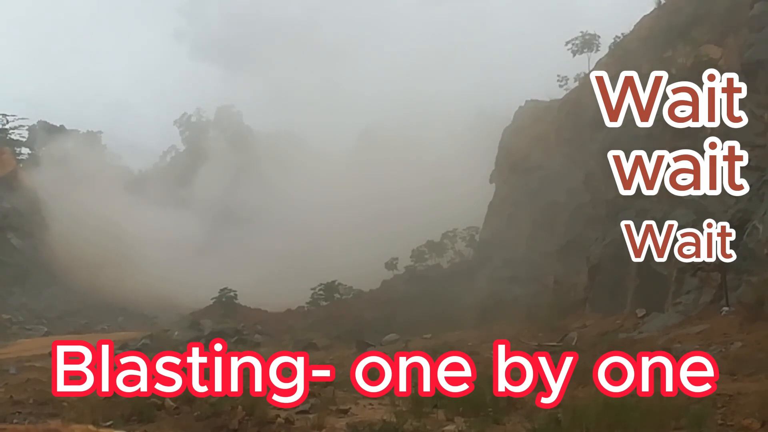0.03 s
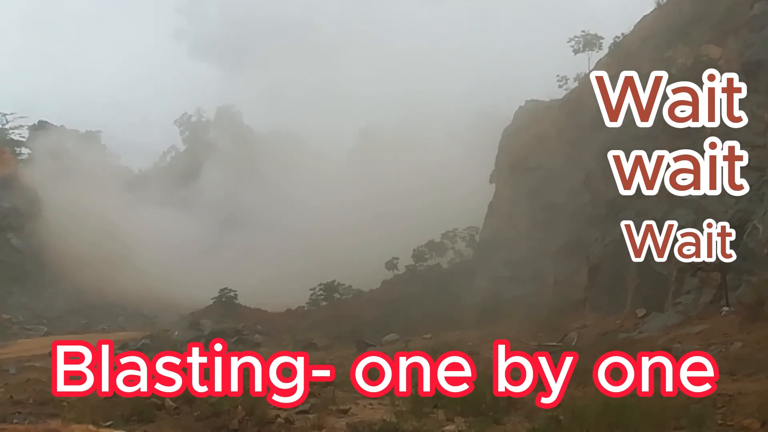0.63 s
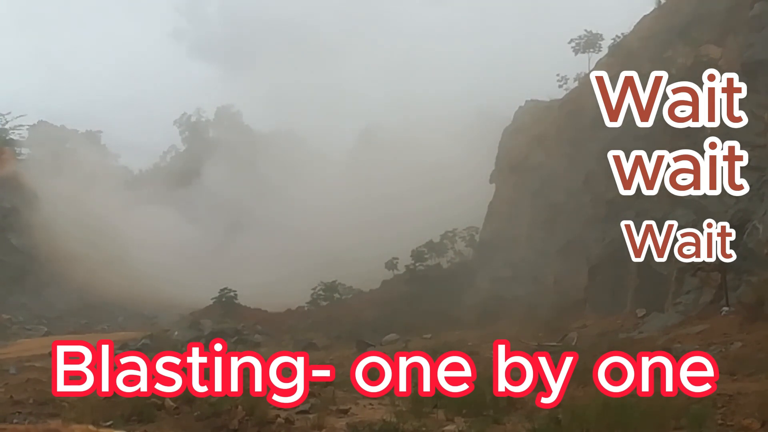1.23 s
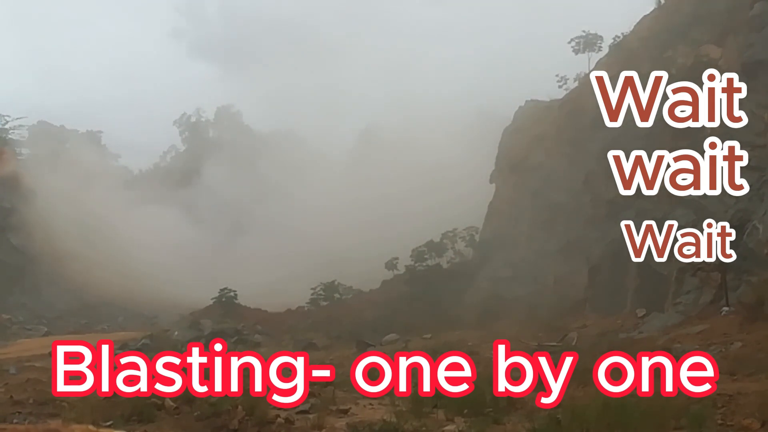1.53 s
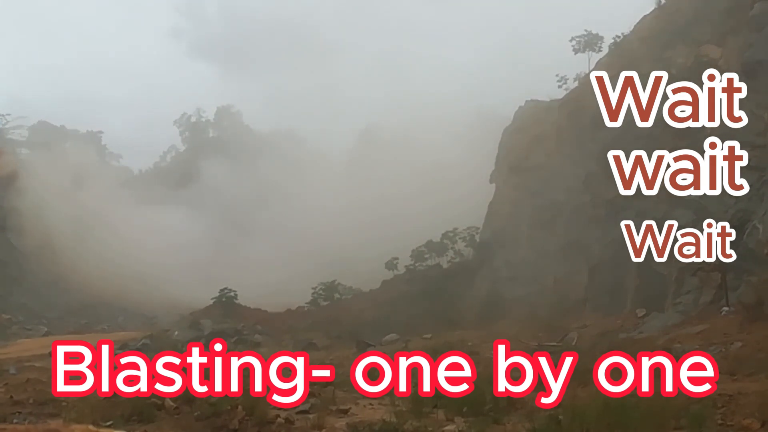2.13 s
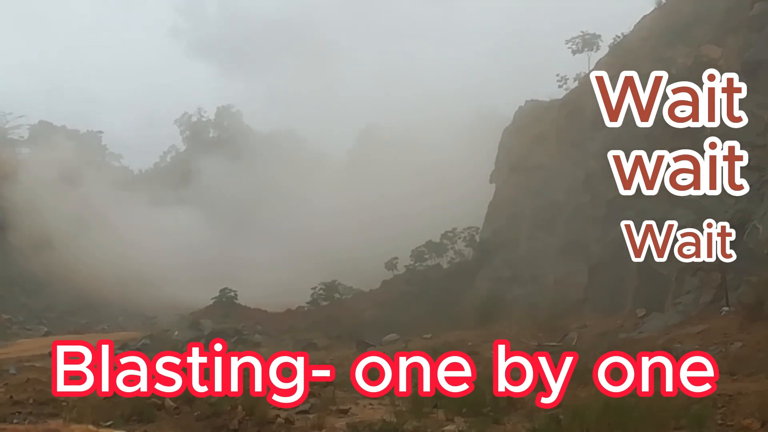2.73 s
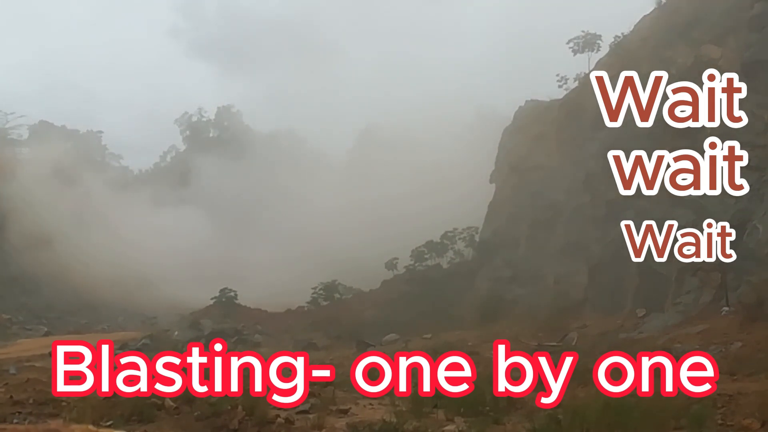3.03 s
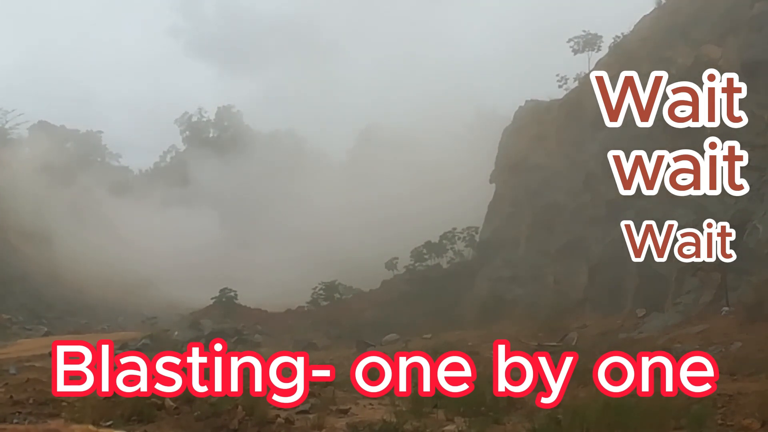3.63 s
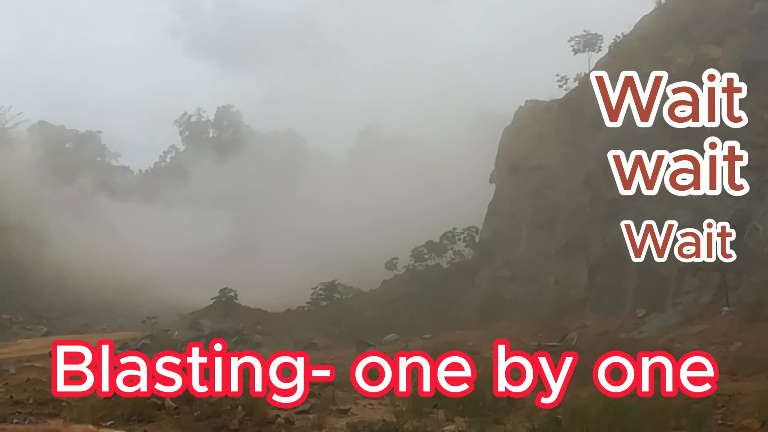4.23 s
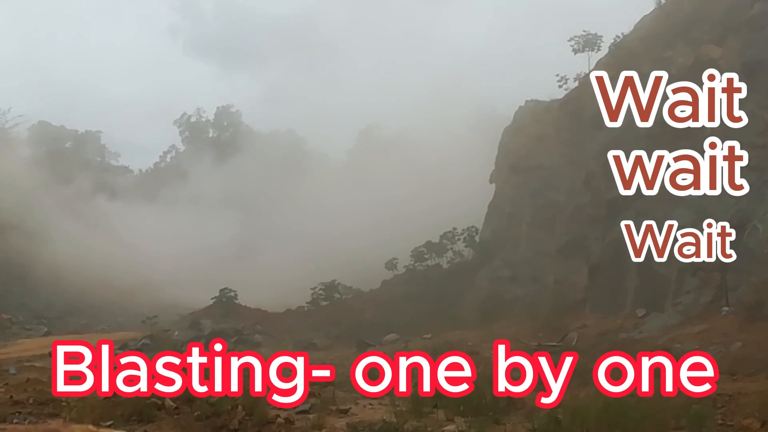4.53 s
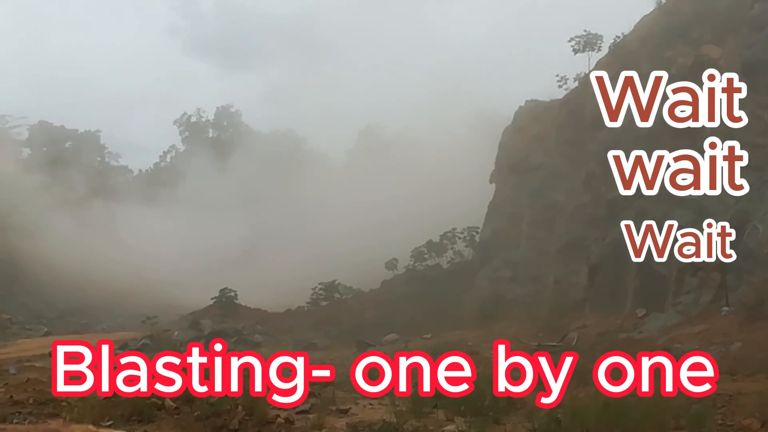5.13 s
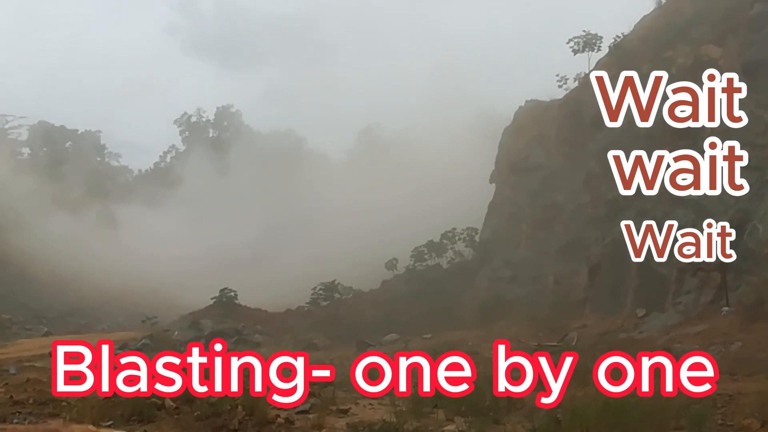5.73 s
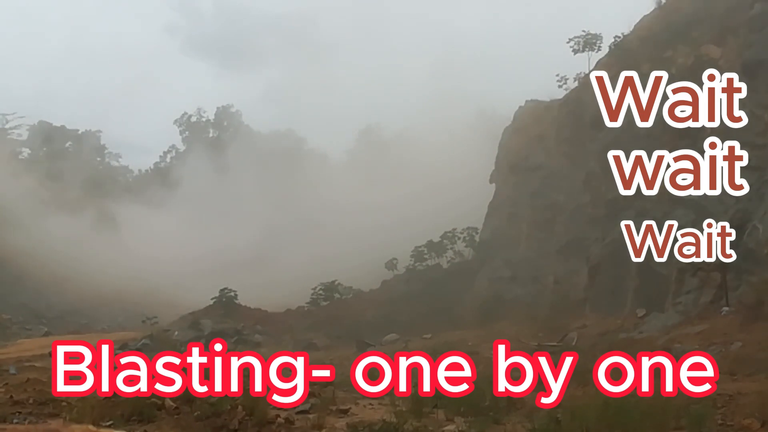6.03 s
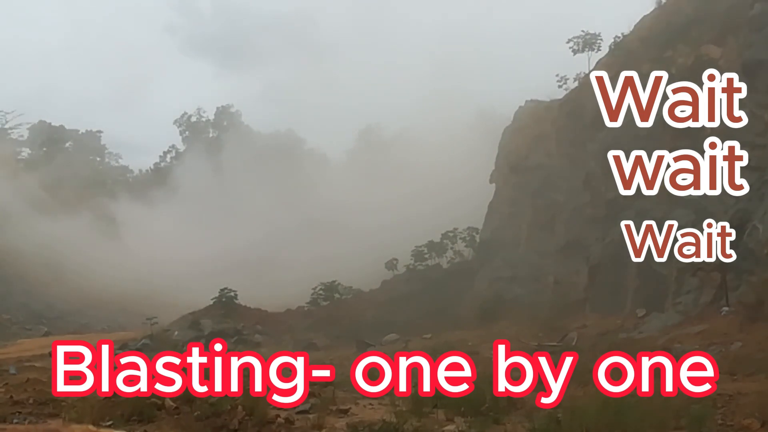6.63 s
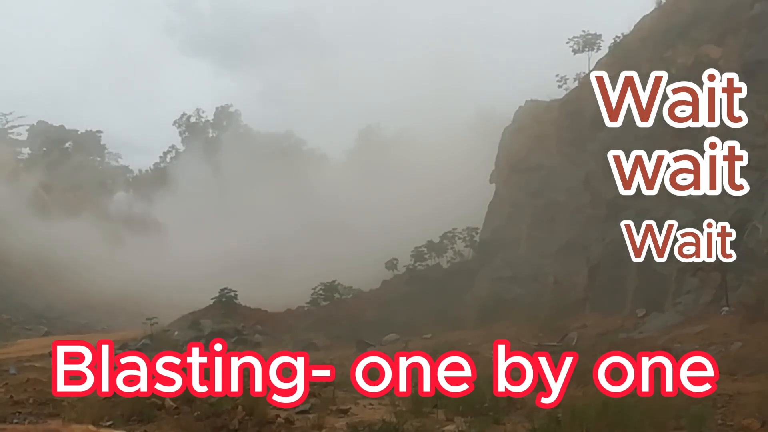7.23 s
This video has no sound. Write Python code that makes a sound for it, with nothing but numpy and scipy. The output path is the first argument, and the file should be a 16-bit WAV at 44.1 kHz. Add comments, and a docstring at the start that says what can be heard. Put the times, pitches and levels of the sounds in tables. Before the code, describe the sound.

A dull shudder and sharp explosion send rock rumbling down a quarry face; the debris settles, then two more blasts follow quickly.

```python
"""Stones clack over a trickle of debris, then shot holes fire one by one in a quarry. Each shot comes
first through the ground as a dull shudder, a fifth of a second later through the air as a boom and crack.
Rock slides down the face, boulders thud into soft spoil, insects sing faintly.
A small two-port microphone rounds off the loudest peaks."""
import sys
import numpy as np
from scipy import signal
from scipy.fft import rfft, irfft, next_fast_len
from scipy.io import wavfile
from scipy.ndimage import uniform_filter1d

SR = 44100
rng = np.random.default_rng(int(sys.argv[2]) if len(sys.argv) > 2 else 0)


def file_out(sig):
    """Save sig as 16-bit WAV at sys.argv[1]."""
    # one column per channel
    cols = np.atleast_2d(sig).T
    # limit, then scale
    lim = np.clip(cols, -1, 1)
    pcm = np.round(lim * 32767).astype(np.int16)
    wavfile.write(sys.argv[1], SR, pcm)


N = 330309

# insect chorus: t/s, level/dB
CHORUS_LEVEL = [(0, -69), (4, -62), (5, -62.5), (7.49, -64.5)]
# source spectra: f/Hz, level/dB
INSECT_SPECTRUM = [(4500, -37), (5600, 0), (6300, 7), (7000, 2.5), (8200, -16), (11000, -39.5)]
AIR_SPECTRUM = [(200, -28), (600, 3), (1250, 12), (2000, 2.5), (4000, -1), (9000, -4), (15000, -6)]
DEBRIS_SPECTRUM = [(200, -1), (380, -7), (600, 1), (800, 6), (1100, 0), (1500, -10.5), (2200, -14),
                   (3000, -10), (4000, -11), (5400, -8), (6500, -17), (8000, -27.5), (10300, -29.5),
                   (15000, -49)]
RUMBLE_SPECTRUM = [(20, -8), (50, 0.5), (110, 2.5), (190, -4), (300, -15), (600, -19.5), (1500, -62)]
SHOCK_SPECTRUM = [(30, -21), (80, 1), (170, -5), (260, -6.5), (380, -21), (700, -32), (1300, -28),
                  (2300, -74), (3500, -100)]
CRACK_SPECTRUM = [(150, -19), (270, -35.5), (500, -15.5), (800, -13), (1150, -22.5), (1700, -39),
                  (3000, -29.5), (5400, -31.5), (7500, -46.5), (10000, -51), (15000, -48)]
# right port against left, for the face and for boulders: f/Hz, level/dB
FACE_SHADE = [(200, -0.4), (400, -1.5), (740, -13.5), (1000, -10.5), (1300, 7.5), (2100, -3.5), (3200, -12),
              (5300, -21), (7800, -12.5), (11000, -10), (15000, 1.5)]
THUD_SHADE = [(200, 1), (450, -3.5), (1000, -11.5), (2000, -9.5)]
# stone strikes: t/s, level/dB, ring f/Hz, tick re ring/dB
STONE_HITS = [(0.014, -36.5, 1160, 14), (0.074, -33.5, 1090, 10.5), (0.201, -35.5, 790, 3.5),
              (0.407, -39, 3310, -17), (0.445, -38.5, 3400, 6), (0.467, -34, 1065, -4),
              (0.502, -43, 800, 4), (1.37, -40.5, 970, 16.5), (1.629, -19, 5630, 3.5),
              (1.678, -20, 726, 12.5), (1.73, -18, 2860, -1), (1.827, -12.5, 860, 2), (1.9, -15, 930, -6),
              (2.416, -20, 800, -26), (2.488, -25, 5990, -20), (3.025, -23, 980, -4),
              (3.101, -24, 6080, -9), (3.265, -25, 1360, 10.5), (3.337, -25, 5700, 0),
              (3.805, -29, 4300, 2), (3.931, -22.5, 5460, -24), (4.342, -24, 1145, -13),
              (4.429, -42, 1140, 14.5), (4.581, -40.5, 4930, 5), (4.843, -44, 2130, 14.5),
              (5.346, -38.5, 3160, -3), (5.692, -40.5, 5580, -1.5)]
# stone resonances: f ratio, level/dB
RING_MODES = [(1, 9), (1.2, -13), (1.58, -12), (2.8, -31)]
# boulder landings: t/s, level/dB, brightness/Hz, t60/s
LANDINGS = [(1.221, -24, 88, 0.1), (1.859, -26, 190, 0.39), (1.999, -31, 190, 0.24),
            (2.243, -24.5, 160, 0.1), (2.521, -29, 131, 0.093), (2.804, -30, 99, 0.11),
            (3.41, -24.5, 88, 0.059), (3.589, -25, 91, 0.053), (3.72, -40, 100, 0.14),
            (4.189, -45, 113, 0.31), (4.426, -44, 131, 0.32), (4.874, -24, 500, 0.17),
            (4.941, -17, 154, 0.035), (4.955, -26.5, 414, 0.25), (5.095, -33, 402, 0.24),
            (5.167, -38.5, 160, 0.089), (5.261, -34.5, 198, 0.048), (5.437, -37, 161, 0.14),
            (5.501, -33, 164, 0.1), (5.607, -40, 169, 0.078), (5.805, -24, 650, 0.31),
            (5.8284, -21, 1020, 0.026), (5.851, -23, 635, 0.095), (5.887, -26.5, 149, 0.14)]
# debris slides: t/s, length/s, gravel/dB, rock/dB, rumble/dB, sizzle re gravel/dB
DEBRIS_SLIDES = [(0, 0.64, -52, -52.5, -51, -18), (0.935, 0.23, -42, -39, -30.5, 0.5),
                 (1.106, 1, -52.5, -42.5, -35, -1), (1.31, 0.87, -40.5, -33, -32, -0.5),
                 (1.56, 3.14, -28.5, -22.5, -27.5, 4), (6.391, 0.057, -34, -30.5, -25, 6.5),
                 (6.5, 2, -38, -34, -24.5, 1), (6.948, 2, -35, -30.5, -45.5, 1)]
# slide envelopes: rise/s, sag/(dB/s), added sag on running out/(dB/s), idle level/dB
GRAVEL_LAW = (0.14, 3.5, 10, -63)
ROCK_LAW = (0.44, 10.5, -3.5, -73)
RUMBLE_LAW = (0.42, 7.5, 6, -55)
# shots through the ground: t/s, jolt/dB, length/s, coda/dB, rasp/dB
GROUND_SHOCKS = [(0.73, -18, 0.046, -20, -54.5), (6.167, -14.5, 0.061, -18.5, -41.5),
                 (6.792, -20.5, 0.11, -25.5, -40)]
# shots through the air: t/s, boom/dB, boom f/Hz, f ratio per surge, crack/dB, crack fall per surge/dB,
# crack top/Hz, front/dB
AIR_BLASTS = [(0.9568, 3, 81, 1.2, -17.5, 3, 8300, 1), (6.408, 6, 120.5, 0.743, -11, 9.5, 12700, 1.5),
              (6.982, 3, 135.8, 0.66, -15, 3.5, 9600, -0.5)]
# three surges of a blast: delay/s, boom offset/dB, boom t60/s, crack t60/s
VENT_SURGES = [(0, 1, 0.074, 0.14), (.0165, -4, 0.097, 0.24), (.045, -9, 0.18, 0.21)]

SETTLE_DB_PER_S = 39  # after a slide or a landing


def undb(db):
    """Decibels to gain."""
    return 10 ** (np.asarray(db) / 20)


def unit(x):
    """Scale to rms 1."""
    return x / np.sqrt(np.mean(x ** 2) + 1e-20)


def colour(x, spectrum):
    """Minimum-phase filter from (f/Hz, level/dB) points; attacks stay sharp."""
    hz, db = np.transpose(spectrum)
    size = next_fast_len(x.shape[-1] + 4096, True)
    size += size % 2
    bins_hz = np.fft.rfftfreq(size, 1 / SR)
    gain = undb(np.interp(np.log(bins_hz + 1), np.log(hz), db))
    cepstrum = irfft(np.log(gain))
    cepstrum[1:size // 2] *= 2
    cepstrum[size // 2 + 1:] = 0
    return irfft(rfft(x, size) * np.exp(rfft(cepstrum)))[..., :x.shape[-1]]


def band(x, hz, kind="bandpass", order=2):
    """Butterworth filter."""
    return signal.sosfilt(signal.butter(order, hz, kind, fs=SR, output="sos"), x)


def waver(rate_hz):
    """Random steps, smoothed twice; rms 1."""
    hold = int(SR / rate_hz)
    steps = np.repeat(rng.standard_normal(N // hold + 1), hold)
    return unit(uniform_filter1d(uniform_filter1d(steps, hold), hold)[:N])


def port_noise(samples, spread):
    """White noise at two ports: one shared part, one of their own each."""
    noise = rng.standard_normal((3, samples))
    return (noise[0] + spread * noise[1:]) / np.sqrt(1 + spread ** 2)


def lagged(x, samples):
    """Delay the right port."""
    return np.array([x[0], np.concatenate([np.zeros(samples), x[1, :-samples]])])


def fade(t, rise_s, t60_s):
    """Quick rise, exponential decay."""
    return (1 - np.exp(-t / rise_s)) * undb(-60 * t / t60_s)


def burst(noise, envelope):
    """Enveloped noise, scaled to the envelope's rms."""
    return unit(noise * envelope) * np.sqrt(np.mean(envelope ** 2))


def add(out, at_s, x):
    """Mix x in at at_s."""
    start = max(int(at_s * SR), 0)
    out[:, start:start + x.shape[-1]] += x[..., :N - start]


def insects_and_air(air_db=-67):
    """Far insect chorus over the faint hiss of open air."""
    chorus_db = np.interp(np.arange(N) / SR, *np.transpose(CHORUS_LEVEL))
    chorus = unit(colour(rng.standard_normal((2, N)), INSECT_SPECTRUM))
    chorus *= undb(chorus_db + .5 * waver(7.4))
    air = unit(colour(rng.standard_normal((2, N)), AIR_SPECTRUM))
    return chorus * undb([[1.5], [-1.5]]) + undb(air_db) * air


def aftershake(band_hz=(24, 120), offset_db=-20.5):
    """Landing boulders leave a deep ground rumble that settles."""
    kicks = np.zeros(N)
    for at_s, db, *_ in LANDINGS:
        kicks[int(at_s * SR)] += undb(db + offset_db) ** 2
    energy = signal.lfilter([1], [1, -undb(-SETTLE_DB_PER_S / SR) ** 2], kicks)
    return unit(band(rng.standard_normal(N), band_hz)) * np.sqrt(energy)


def boulders(contact_cycles=.41, spoil_hz=(28, 125)):
    """Blocks land in soft spoil: one push, shorter for a bright landing, then the spoil shakes."""
    out, t = np.zeros((2, N)), np.arange(SR // 3) / SR
    for at_s, db, hz, t60_s in LANDINGS:
        spoil = band(port_noise(len(t), spread=.82), spoil_hz, order=1)
        shake = burst(band(spoil, 1.18 * hz, "lowpass", order=3), fade(t, .0016, t60_s))
        push = -.87 * np.exp(-((t - .0025) * hz / contact_cycles) ** 2) * (1 - np.exp(-t / .00067))
        # only the hardest landings knock on bare rock
        knock = -(hz / 600) ** 3 * np.exp(-((t - .0027) / .00028) ** 2)
        impact = band(push + knock, 28, "highpass")
        thud = band(shake + impact, min(7.4 * hz, 1800), "lowpass", order=6)
        add(out, at_s, undb(db + 2.5) * undb([[1], [-1]]) * thud)
    return out


def stones(ring_t60_s=.068, half_width_hz=115, rattle_db=-12.5):
    """Single stones strike rock: broad tick, short ring, rattle of loosened grit."""
    out, t = np.zeros((2, N)), np.arange(SR // 4) / SR
    for at_s, db, hz, tick_db in STONE_HITS:
        noise = port_noise(len(t), spread=.73)
        ring = sum(undb(mode_db) * unit(band(noise, [k * hz - half_width_hz, k * hz + half_width_hz]))
                   for k, mode_db in RING_MODES if k * hz < 7000)
        grit = band(colour(noise, DEBRIS_SPECTRUM), [600, 7500])
        rattle = fade(t, .0048, t60_s=.32) * undb(2.9 * waver(420)[:len(t)] + rattle_db)
        tick = burst(grit, fade(t, .00026, t60_s=.0084) + rattle)
        clack = burst(ring, fade(t, .00077, ring_t60_s)) + undb(tick_db + 1) * tick
        add(out, at_s, undb(db - 4) * clack)
    return out


def chips(count=2200, lowest_hz=2600):
    """Hard splinters tick, each at its own pitch, with hardly any ring."""
    out, t = np.zeros((2, N)), np.arange(SR // 30) / SR
    envelope = fade(t, .0001, t60_s=.028)
    for when, pitch, size, side in rng.random((count, 4)):
        hz = lowest_hz * 4 ** pitch
        pan = np.array([[np.cos(side * np.pi / 2)], [np.sin(side * np.pi / 2)]])
        tick = np.sin(2 * np.pi * hz * t) * envelope
        add(out, when * N / SR, (size + .02) ** -.35 * pan * tick)
    return unit(out)


def grains(rate_hz, scatter_db, t60_s, tail_gain, spread):
    """Small impacts of scattered size, each a tick and a short noise tail."""
    sizes = undb(scatter_db * np.minimum(rng.exponential(size=N), 4))
    ticks = (rng.random(N) < rate_hz / SR) * sizes / np.sqrt(rate_hz)
    pole = np.exp(-np.log(1000) / (t60_s * SR))  # t60_s: tail energy down to 1/1000
    energy = signal.lfilter([1 - pole], [1, -pole], ticks ** 2)
    return unit((ticks + tail_gain * np.sqrt(energy)) * port_noise(N, spread))


def flow(law, levels_db, run_out_share=.56):
    """Debris envelope: each slide swells, sags, runs out and settles over an idle trickle."""
    rise_s, sag_db_per_s, run_out_db_per_s, idle_db = law
    t = np.arange(0, N / SR, .005)
    power = undb(idle_db) ** 2
    for (at_s, length_s, *_), db in zip(DEBRIS_SLIDES, levels_db):
        age_s = np.maximum(t - at_s, 0)
        swell = np.minimum(age_s / min(rise_s, length_s / 2), 1)
        fall_db = (sag_db_per_s * age_s
                   + run_out_db_per_s * np.maximum(age_s - run_out_share * length_s, 0)
                   + SETTLE_DB_PER_S * np.maximum(age_s - length_s, 0))
        power = power + (swell * undb(db - fall_db)) ** 2
    return np.interp(np.arange(N) / SR, t, np.sqrt(power))


def rockslide(split_hz=1900, sizzle_hz=6400):
    """Rocks clatter and gravel hisses down the face; the moving mass rumbles underneath."""
    _, _, gravel_db, rock_db, rumble_db, sizzle_db = np.transpose(DEBRIS_SLIDES)
    pour = flow(GRAVEL_LAW, gravel_db)
    density = (pour / pour.max()) ** .45  # fewer impacts in a thin trickle
    rocks = grains(700 * density, scatter_db=3.3, t60_s=.08, tail_gain=1.7, spread=.6)
    rocks = unit(band(colour(rocks, DEBRIS_SPECTRUM), [300, split_hz], order=3))
    gravel = grains(2400 * density, scatter_db=3.4, t60_s=.045, tail_gain=2, spread=2)
    gravel += undb(-11) * chips()
    gravel = unit(band(colour(gravel, DEBRIS_SPECTRUM), split_hz, "highpass", order=3))
    dull = signal.sosfiltfilt(signal.butter(6, sizzle_hz, fs=SR, output="sos"), gravel)
    hiss = dull * pour + (gravel - dull) * flow(GRAVEL_LAW, gravel_db + sizzle_db)
    rumble = unit(colour(port_noise(N, spread=.03), RUMBLE_SPECTRUM))
    return (rocks * flow(ROCK_LAW, rock_db) * undb(.7 * waver(18))
            + hiss * undb(-.5 * waver(22))
            + rumble * flow(RUMBLE_LAW, rumble_db) * undb(2 * waver(7.5)))


def ground_shocks(edge_s=.02, knock_db=-24.5, crunch_db=-40):
    """A charge jolts the ground with a hollow knock; shudder, crunch and rasp last until the blast."""
    out, t = np.zeros((2, N)), np.arange(SR // 2) / SR
    for at_s, db, length_s, coda_db, rasp_db in GROUND_SHOCKS:
        white = port_noise(len(t), spread=.48)
        ground = colour(white, SHOCK_SPECTRUM)
        onset = 1 - np.exp(-t / edge_s)
        handover = (1 + np.tanh((t - length_s) / edge_s)) / 2
        gate = (1 - np.tanh((t - .27) / .024)) / 2
        jolt = burst(ground, onset * (1 - handover))
        coda = burst(ground, fade(t, .011, t60_s=1.47) * handover * gate)
        shudder = band(undb(db) * jolt + undb(coda_db) * coda, 1630, "lowpass", order=4)
        rasp = unit(band(band(white, [750, 1650]), 4000, "lowpass", order=4))
        rasp *= np.exp(-((t - .11) / .04) ** 2)
        knock = burst(band(white, [200, 370], order=5), fade(t, .0034, t60_s=.32))
        crunch = burst(band(white, [520, 1250], order=3), onset * gate)
        add(out, at_s, shudder + undb(rasp_db) * rasp + undb(knock_db) * knock + undb(crunch_db) * crunch)
    return out


def heaves(hz=38, offset_db=-12):
    """Rock lifted by each blast pushes a slow, deep wave of air."""
    out, t = np.zeros((2, N)), np.arange(SR // 2) / SR
    wave = -np.sin(2 * np.pi * hz * t) * fade(t, .0038, t60_s=.37)
    for at_s, boom_db, *_ in AIR_BLASTS:
        add(out, at_s, undb(boom_db + offset_db) * wave)
    return out


def fronts(band_hz=(330, 1250), delay_s=.004885, gap_s=.007, fall_db=2.5):
    """Four steep pressure fronts open each blast: midrange snaps, each weaker than the last."""
    out, t = np.zeros((2, N)), np.arange(SR // 20) / SR
    for at_s, *_, db in AIR_BLASTS:
        for k, noise in enumerate(rng.standard_normal((4, len(t)))):
            snap = burst(band(noise, band_hz), fade(t, .0012, t60_s=.009))
            add(out, at_s + delay_s + k * gap_s, undb(db - 5 - k * fall_db) * snap)
    return out


def crack(t, flutter_hz, t60_s, top_hz, leak_db=-7, flutter_db=3):
    """Gas leaks, then bursts out at t = 0, fluttering with the pressure swings."""
    vent = fade(np.maximum(t, 0), .0026, t60_s) + undb(leak_db) * np.exp(-np.abs(t) / .0095)
    flutter = undb(flutter_db * np.sin(2 * np.pi * flutter_hz * t))
    gas = colour(port_noise(len(t), spread=1), CRACK_SPECTRUM)
    gas = band(band(gas, 283, "highpass", order=3), top_hz, "lowpass", order=5)
    return burst(gas, vent * flutter)


def boom(t, hz, t60_s, roughness=.26):
    """A few heavy pressure swings, roughened by turbulence."""
    envelope = fade(t, 1 / (4 * hz), t60_s)
    turbulence = band(colour(rng.standard_normal(len(t)), SHOCK_SPECTRUM), 380, "lowpass")
    return -np.sin(2 * np.pi * hz * t) * envelope + roughness * burst(turbulence, envelope)


def air_blasts(leak_s=.04, crack_lag_s=.004):
    """Each charge vents in three surges, each a boom and a crack."""
    out, t = np.zeros((2, N)), np.arange(SR // 2) / SR
    for at_s, boom_db, first_hz, ratio, crack_db, fall_db, top_hz, _ in AIR_BLASTS:
        for k, (delay_s, offset_db, boom_t60_s, crack_t60_s) in enumerate(VENT_SURGES):
            surge_s, hz = at_s + delay_s, first_hz * ratio ** k
            add(out, surge_s, undb(boom_db + offset_db) * boom(t, hz, boom_t60_s))
            gas = crack(t - leak_s, hz, crack_t60_s, top_hz)
            add(out, surge_s + crack_lag_s - leak_s, undb(crack_db - k * fall_db) * gas)
    return out


def scene():
    """The face lies to the left, so the right port is late and shaded; boulders land further round."""
    left, right = rockslide() + air_blasts() + heaves() + fronts() + stones()
    face = np.array([left, colour(right, FACE_SHADE)]) + ground_shocks()
    near, far = boulders()
    thuds = np.array([near, colour(far, THUD_SHADE)])
    return lagged(face, samples=16) + lagged(thuds, samples=27) + aftershake() + insects_and_air()


def record(dry):
    """The microphone rounds the biggest swings; low-pass at 15.8 kHz."""
    rounded = dry / (1 + dry ** 4) ** (1 / 4)
    return signal.sosfilt(signal.ellip(8, .2, 70, 15800, fs=SR, output="sos"), rounded)


dry = scene()
out = record(dry)
file_out(out)
```